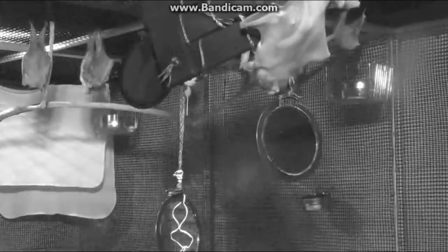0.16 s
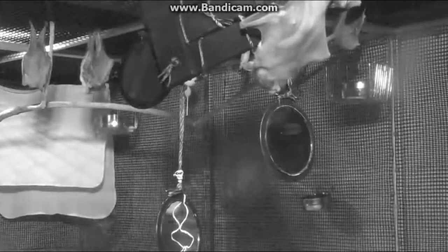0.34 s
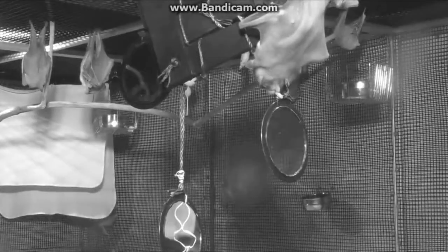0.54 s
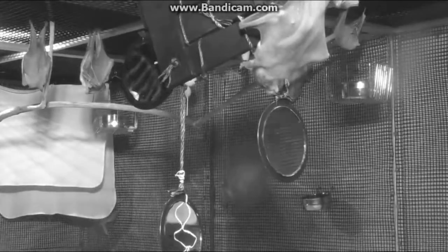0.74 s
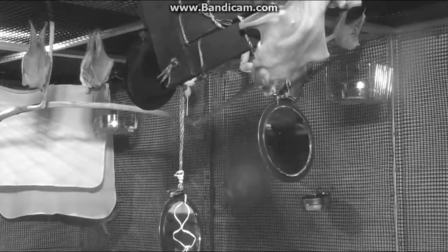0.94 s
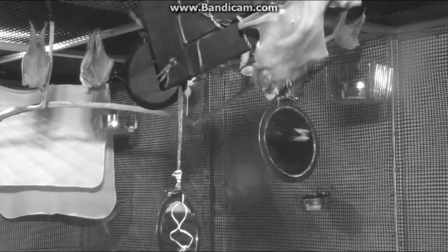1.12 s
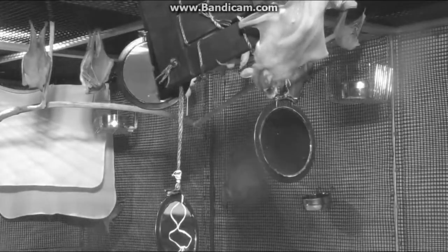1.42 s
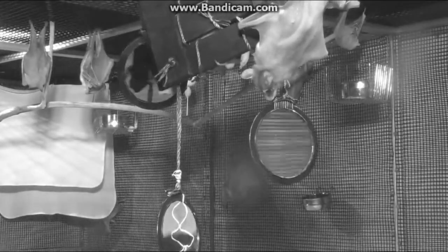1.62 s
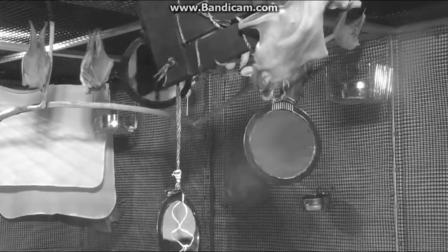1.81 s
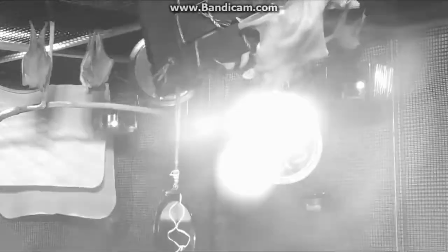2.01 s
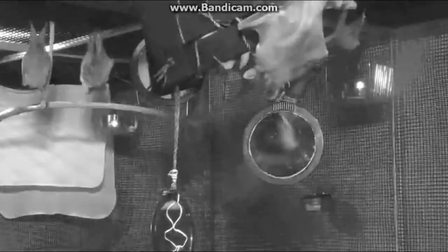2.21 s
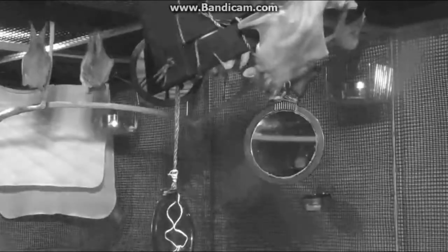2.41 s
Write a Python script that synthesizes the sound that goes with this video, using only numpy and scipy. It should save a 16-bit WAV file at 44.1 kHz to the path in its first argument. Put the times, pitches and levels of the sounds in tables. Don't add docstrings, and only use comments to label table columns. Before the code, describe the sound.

Fruit bats squabble in a hard, ringing enclosure over steady ventilation rumble and hiss. A breathy screech fades at the start; short rough squawks and nasal hums scatter until 1 s, with a faint claw tick at 0.2. The loudest squawks cluster at 1.05-1.2, hissy screeches at 1.4-1.85, and high yelps at 2.2. Another tick comes at 2.4, then faint calls. Distant bats chatter dully throughout.

```python
import sys
import numpy as np
from scipy import signal
from scipy.fft import rfft, irfft, next_fast_len
from scipy.io import wavfile
from scipy.ndimage import uniform_filter1d

SR = 44100
rng = np.random.default_rng(int(sys.argv[2]) if len(sys.argv) > 2 else 0)


def ratio(d):
    e = np.asarray(d, float) / 20
    return 10 ** e


def log_audio(samples):
    frames = np.atleast_2d(samples).T
    limited = np.clip(frames, -1, 1)
    pcm = np.round(limited * 32767).astype(np.int16)
    wavfile.write(sys.argv[1], SR, pcm)


N = 112454
CALL_PAD = 200


def curve(table, hz):
    points = np.array(table, float)
    return np.interp(np.log(np.maximum(hz, 1.)), np.log(points[:, 0]), points[:, 1])


def unit(x):
    return x / np.sqrt(np.mean(x ** 2) + 1e-20)


def colour(x, db_of):
    n = next_fast_len(len(x))
    hz = np.arange(n // 2 + 1) * SR / n
    return irfft(rfft(x, n) * ratio(db_of(hz)), n)[:len(x)]


def hump(hz, centre_hz, width_hz, db):
    return db * np.exp(-.5 * ((hz - centre_hz) / width_hz) ** 2)


def half_octave(f, hz):
    return -12 * (np.log2(np.maximum(f, 1.) / hz) / .5) ** 2


def wander(n, rate):
    k = max(int(SR / rate), 2)
    noise = rng.standard_normal(4608)
    smooth = uniform_filter1d(uniform_filter1d(noise, k), k)
    return smooth[:n] * np.sqrt(1.5 * k)


def add(out, s, x):
    i = int(s * SR)
    x = x[max(-i, 0):N - i]
    out[max(i, 0):max(i, 0) + len(x)] += x


def call(length, hz, rise, sag, attack_s, release_s, jitter, flutter_db, breath_db, count,
         top=0.4134, sub=0, bright=0):
    t = np.arange(int(length * SR)) / SR
    n, u = len(t), t / length
    climb = rise * np.clip(1 - u / top, 0, 1) ** 2
    fall = sag * np.clip((u - top) / (1 - top), 0, 1) ** 2
    pitch = hz * (1 - climb - fall) * (1 + jitter * wander(n, 400))
    phase = 2 * np.pi * np.cumsum(pitch) / SR
    voice = 0
    for k in range(1, count + 1):
        audible = k * hz < .45 * SR
        voice = voice + np.cos(k * phase + k * k) * ratio(flutter_db * wander(n, 112)) * audible
    voice = voice * (1 + sub * np.cos(phase / 2)) * np.sqrt(4 * hz / SR)
    noise = rng.standard_normal(n)
    puff = (noise - bright * np.roll(noise, 1)) * (1 + .6 * np.cos(phase))
    edge = (np.clip(t / attack_s, 0, 1) * np.clip((length - t) / release_s, 0, 1)) ** 1.2
    x = (voice + ratio(breath_db) * puff) * edge * ratio(wander(n, 120))
    return np.pad(x, (CALL_PAD, CALL_PAD))


# freq_hz, level_db (per Hz)
AIR_SPECTRUM = [(25, -43), (45, -27), (65, 4.5), (250, 2.5), (400, 0), (2200, -10), (4500, -11.5),
                (15500, -36)]
# freq_hz, level_db
FAN_TONES = [(118, -61), (182, -63), (243, -58)]
AIR_DB = -49.5


def air():
    t = np.arange(N) / SR

    def slow(rate):
        return np.interp(t, np.arange(100) / rate, rng.standard_normal(100))

    hiss = 0
    for hz in 30 * 2 ** np.arange(0, 9.5, .5):
        band = colour(rng.standard_normal(N), lambda f: curve(AIR_SPECTRUM, f) + half_octave(f, hz))
        hiss = hiss + band * ratio(0.41 * slow(4.3))
    fan = 0
    for hz, db in FAN_TONES:
        phase = 2 * np.pi * np.cumsum(hz * (1 + 0.012 * slow(21.74))) / SR
        fan = fan + ratio(db) * np.sin(phase) * ratio(0.48 * slow(7.8))
    return ratio(AIR_DB) * unit(hiss) + fan


# time_s, level_db
FAR_CHATTER = [(0, -48), (.4, -45.5), (1., -44.5), (1.4, -51), (2., -53), (2.3, -49), (2.55, -64.5)]


def colony():
    out, rows = np.zeros(N), rng.random((60, 3))
    for k, (when, pitch, size) in enumerate(rows):
        x = call(.05, 480 + 420 * pitch, .25, .15, .015, .015, .015, 3.5, -5, count=6)
        add(out, (k + when) / len(rows) * N / SR - .03, unit(x) * ratio(3 * size))

    def distant(f):
        return hump(f, 700, 200, 7) + hump(f, 1600, 500, 12) + hump(f, 3300, 900, 13) - 2.4 * f / 1000

    time_s, level_db = np.array(FAR_CHATTER).T
    return unit(colour(out, distant)) * ratio(np.interp(np.arange(N) / SR, time_s, level_db))


# start_s, length_s, level_db, pitch_hz (top), upper_hz (resonance)
SCREECH_CALLS = [(-.03, 0.076, -41.5, 1663, 6000), (0.776, 0.022, -40.5, 1733, 6960),
                 (0.909, 0.047, -46, 1563, 6960), (1.279, 0.022, -40.5, 1672, 5600),
                 (1.429, 0.069, -36, 1626, 7400), (1.548, 0.082, -30.5, 1694, 6460),
                 (1.609, 0.082, -31.5, 1574, 6270), (1.784, 0.049, -35.5, 1606, 5860),
                 (2.062, 0.066, -39.5, 1667, 4700), (2.083, 0.048, -36, 1678, 6700),
                 (1.414, 0.02, -39, 1625, 7400), (2.263, 0.028, -36, 1792, 6950),
                 (2.191, 0.046, -43.5, 1673, 7000), (0.198, 0.033, -47.5, 1700, 10800),
                 (0.67, 0.04, -53, 1630, 6350), (0.871, 0.039, -45.5, 1757, 9200),
                 (1.925, 0.041, -49.5, 1720, 6760)]
# freq_hz, gain_db
SCREECH_TRACT = [(1000, -14), (2500, -14.5), (3100, 3.5), (3700, 5.5), (5000, -5.5), (9500, -6),
                 (11500, -16.5), (15500, -21)]


def screeches():
    out = np.zeros(N)
    for s, length, db, hz, upper in SCREECH_CALLS:
        x = call(length, hz, 0.0545, 0.0646, 0.012, 0.028, 0.03, 1.3, 2, count=9)
        x = colour(x, lambda f: curve(SCREECH_TRACT, f) + hump(f, upper, 880, 8.3))
        add(out, s - CALL_PAD / SR, ratio(db) * unit(x))
    return out


# start_s, length_s,
# level_db, pitch_hz
HUM_CALLS = [(0.079, 0.013, -48, 1450), (0.094, 0.029, -51, 712), (0.216, 0.022, -44.5, 950),
             (0.293, 0.012, -44.5, 1590), (.385, 0.021, -47, 1547), (.42, 0.02, -42, 965),
             (0.442, 0.015, -45, 1570), (0.531, 0.044, -75, 1560), (0.551, 0.042, -40, 948),
             (0.654, 0.084, -48.5, 1506), (0.765, 0.031, -50, 632), (.855, 0.034, -50, 1467),
             (0.895, 0.022, -49, 694), (1.071, 0.08, -42.5, 692), (1.132, 0.031, -39, 685),
             (1.142, 0.027, -45.5, 1423), (1.419, 0.054, -51.5, 664), (1.58, 0.022, -47.5, 956),
             (1.952, 0.021, -50, 682), (2.097, 0.036, -48, 670), (2.18, 0.066, -51.5, 751),
             (2.261, 0.019, -47.5, 885), (1.408, 0.031, -54, 1726), (2.523, 0.052, -46.5, 1696),
             (0.202, 0.047, -36.5, 4865), (0.203, 0.039, -57, 6870), (0.465, 0.017, -44, 2380),
             (0.092, 0.027, -50.5, 2163), (2.039, 0.024, -50, 2580), (2.524, 0.035, -56, 2170),
             (2.523, 0.04, -59, 4000), (0.579, 0.025, -49, 670), (2.398, 0.051, -53.5, 640),
             (1.933, 0.0276, -49.5, 4330)]


def hums():
    out = np.zeros(N)
    for s, length, db, hz in HUM_CALLS:
        x = call(length, hz, 0.0903, 0.055, 0.0042, 0.013, 0.011, 2.3, -45.0, count=1)
        add(out, s - CALL_PAD / SR, ratio(db) * unit(x))
    return out


# freq_hz, gain_db
SQUAWK_TRACT = [(2400, -3.5), (3200, 4), (5300, -3), (6600, -11), (8300, -5.5), (10600, -8), (12000, -24.5),
                (15500, -17.5)]
EFFORT_THIN, EFFORT_TILT, EFFORT_BREATH = 0.72, 0.69, .2


def open_mouth(out, s, length, db, hz, mouth, attack, top, sub, dull_db=0):
    x = call(length, hz, rise=.24, sag=.12, attack_s=max(.013, attack * length), release_s=0.006,
             jitter=.008, flutter_db=2.2, breath_db=-10 + EFFORT_BREATH * (db + 45), count=20,
             top=top, sub=sub, bright=1)

    def tract(f):
        treble = EFFORT_TILT * (db + 30) * np.clip((f - 4800) / 1500, 0, 1)
        dulling = dull_db * np.clip(f / 1500 - 6, 0, 1)
        thinning = EFFORT_THIN * max(db + 40.5, 0) * np.clip(3 - f / 900, 0, 1)
        return curve(SQUAWK_TRACT, f) + hump(f, mouth, 1010, 14.9) + treble + dulling - thinning

    add(out, s - CALL_PAD / SR, ratio(db) * unit(colour(x, tract)))


# start_s, length_s, level_db, pitch_hz (top), mouth_hz (resonance)
SQUAWK_CALLS = [(0.092, 0.055, -44.5, 733, 3400), (.192, 0.051, -36.5, 977, 4700),
                (0.297, 0.058, -42, 902, 3240), (0.407, 0.028, -40, 951, 3520),
                (0.439, 0.038, -43.5, 787, 3380), (0.521, 0.056, -40.5, 960, 3500),
                (0.57, 0.038, -42, 874, 3300), (0.746, 0.029, -39.5, 704, 3900),
                (0.772, 0.037, -35, 708, 4000), (0.861, 0.039, -34, 926, 4350),
                (.888, 0.032, -35, 880, 3960), (0.989, 0.056, -36, 798, 3770),
                (1.068, 0.0406, -25.5, 830, 4340), (1.105, .058, -24.5, 811, 4580),
                (1.135, 0.046, -29, 679, 4060), (1.158, 0.03, -34, 839, 3350),
                (1.272, 0.0247, -39, 753, 3220), (1.405, 0.038, -38, 666, 3600),
                (1.919, 0.041, -41, 732, 3960), (1.96, 0.022, -64, 720, 3830),
                (2.032, 0.035, -48.5, 640, 2600), (2.262, 0.044, -40.5, 930, 4830),
                (2.21, 0.019, -34.5, 906, 4000), (2.223, 0.036, -55, 820, 3340),
                (2.38, 0.054, -46, 798, 3070)]


def squawks():
    out = np.zeros(N)
    for s, length, db, hz, mouth in SQUAWK_CALLS:
        open_mouth(out, s, length, db, hz, mouth, attack=.22, top=.4, sub=.15)
    return out


# start_s, level_db
CLAW_TICKS = [
    (2.407, -43),
    (.2, -46),
]


def ticks():
    out, t = np.zeros(N), np.arange(900) / SR
    for s, db in CLAW_TICKS:
        x = rng.standard_normal(len(t)) * np.exp(-t / .012) * np.clip(t / .003, 0, 1)
        x = colour(x, lambda f: hump(f, 3200, 2600, 15.6) - 20 * np.clip((f - 10000) / 1500, 0, 1))
        add(out, s, ratio(db) * unit(x))
    return out


# start_s, length_s, level_db, pitch_hz (top),
# mouth_hz (resonance)
YELP_CALLS = [
    (.645, 0.061, -37, 760, 3800),
    (2.182, .027, -31.5, 2014, 3900),
    (2.19, 0.028, -32, 1645, 3500),
    (2.232, 0.026, -34, 1800, 3500),
    (2.248, 0.03, -29.5, 1840, 4750),
    (2.512, 0.042, -51, 572, 3480),
]


def yelps():
    out = np.zeros(N)
    for s, length, db, hz, mouth in YELP_CALLS:
        open_mouth(out, s, length, db, hz, mouth, attack=.45, top=.85, sub=.35, dull_db=-10)
    return out


# freq_hz, t60_s
WALL_T60 = [(300, 0.11), (1200, 0.48), (3000, 0.44), (4500, 0.21), (6500, 0.28), (12000, 0.22)]


def room(x):
    t, tail = np.arange(SR // 2) / SR, 0
    for hz in 125 * 2 ** np.arange(0, 7.5, .5):
        band = colour(rng.standard_normal(len(t)), lambda f: half_octave(f, hz))
        tail = tail + band * ratio(-60 * t / curve(WALL_T60, hz))
    tail = tail * np.clip(t / 0.011, 0, 1)
    return signal.fftconvolve(x, tail / np.sqrt(np.sum(tail ** 2)))[:N]


ROOM_DB, SIDE_DB, SIDE_HZ = -5.5, -22, 8000


def scene():
    bats = colony() + screeches() + hums() + squawks() + ticks() + yelps()
    mid = bats + ratio(ROOM_DB) * room(bats) + air()

    def side_db(f):
        rising = 14 * np.log2(np.clip(f / SIDE_HZ, 1e-3, 1.5))
        floor = -6 - 14 * np.log2(np.maximum(f / 300, 1))
        return np.maximum(rising, floor)

    side = ratio(SIDE_DB) * colour(room(mid), side_db)
    return np.array([mid + side, mid - side])


# start_s, end_s, low_hz, high_hz
SILENT_PATCHES = [(1.09, 1.185, 6250, 7300), (.205, .255, 8150, 9000), (.242, .3, 7650, 8250),
                  (.65, .67, 7000, 8200), (.698, .72, 6800, 7500), (.77, .81, 5500, 5800),
                  (.868, .905, 6900, 7350), (.985, 1.005, 6900, 7400), (.96, .985, 5450, 5800),
                  (1.05, 1.068, 5600, 7300), (1.22, 1.245, 6900, 7300), (2.175, 2.203, 6950, 7300),
                  (.425, .47, 6800, 7300), (.445, .465, 6200, 6800), (.555, .61, 6900, 7300),
                  (1.01, 1.045, 6200, 6550), (2.215, 2.245, 9900, 10400), (2.3, 2.325, 9900, 10400),
                  (2.255, 2.29, 11500, 12300), (2.185, 2.22, 11800, 13400), (2.245, 2.3, 13600, 15000)]


def empty_bands(x):
    f, t, z = signal.stft(x, SR, nperseg=512, noverlap=384)
    for start, end, low, high in SILENT_PATCHES:
        in_band = (f >= low) & (f <= high)
        in_time = (t >= start) & (t <= end)
        z = z * (1 - in_band[:, None] * in_time)
    return signal.istft(z, SR, nperseg=512, noverlap=384)[1][:, :N]


def band_limit(x):
    return signal.sosfilt(signal.butter(12, 15730, fs=SR, output="sos"), x)


def record(dry):
    x = empty_bands(dry)
    top_cut = signal.ellip(14, .2, 80, 15750, fs=SR, output="sos")
    return band_limit(signal.sosfilt(top_cut, x))


dry = scene()
out = record(dry)
log_audio(out)
```